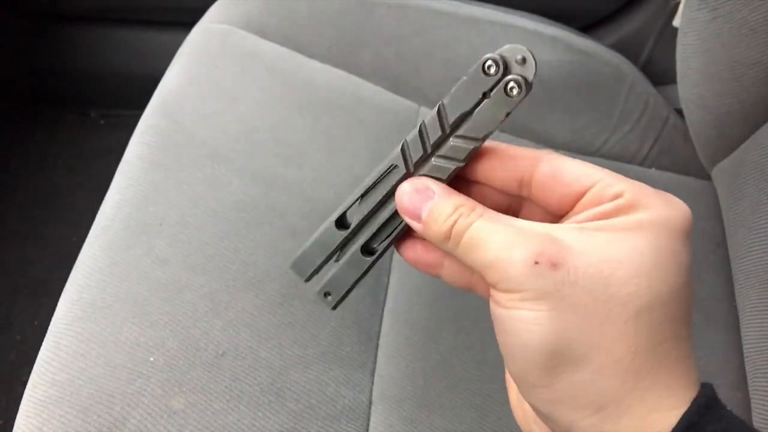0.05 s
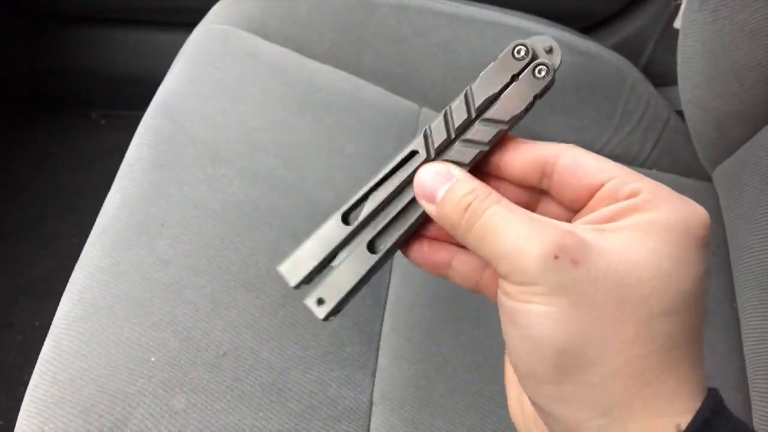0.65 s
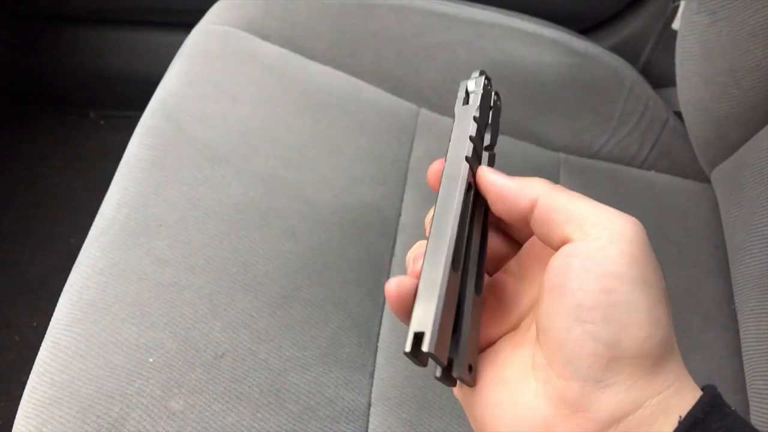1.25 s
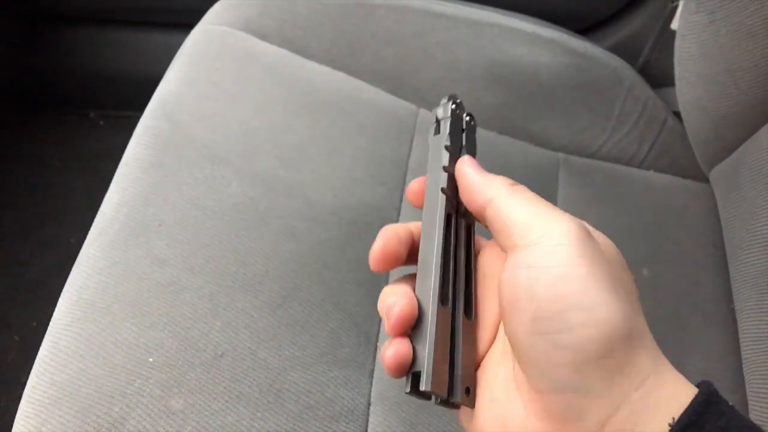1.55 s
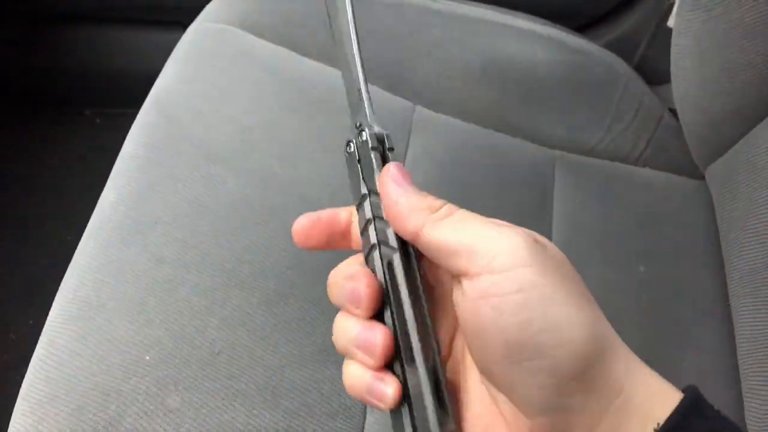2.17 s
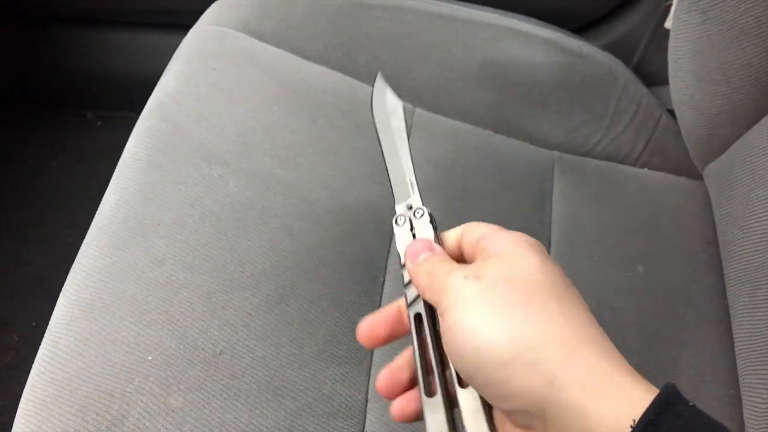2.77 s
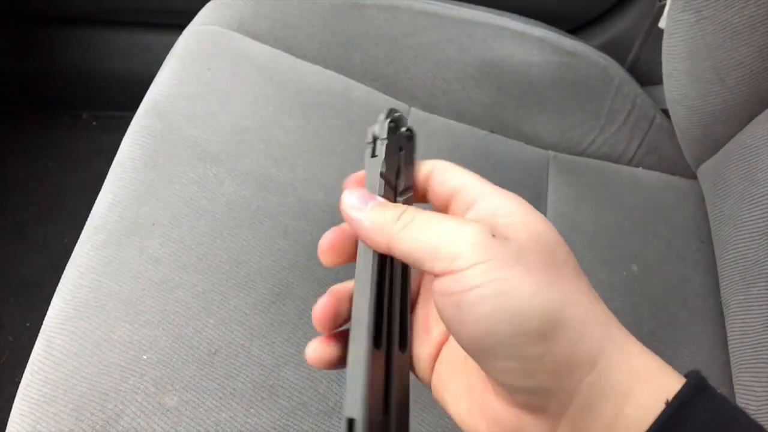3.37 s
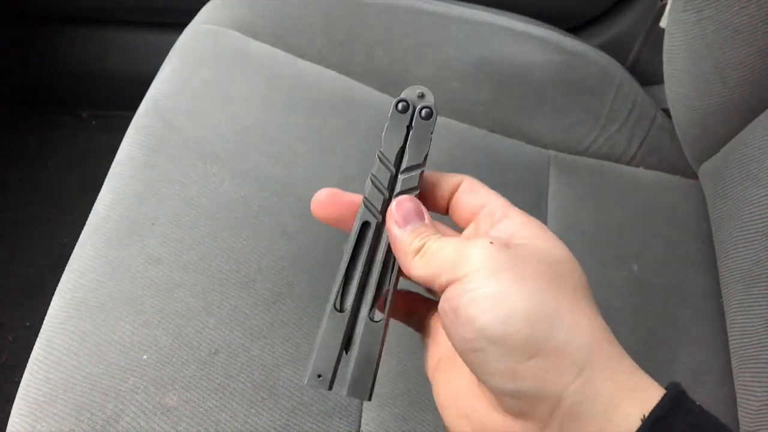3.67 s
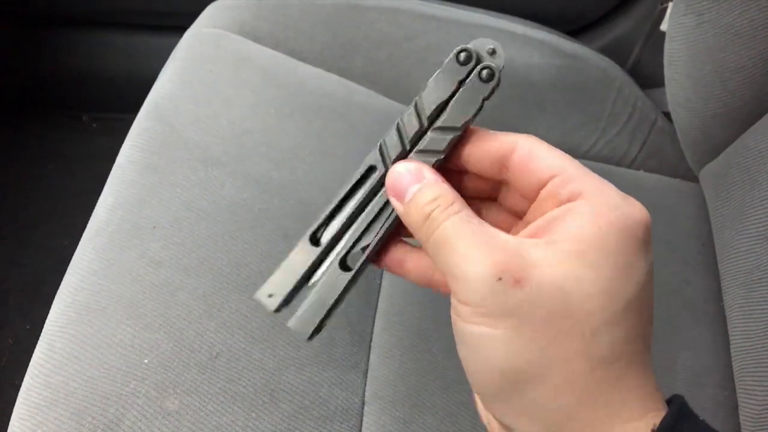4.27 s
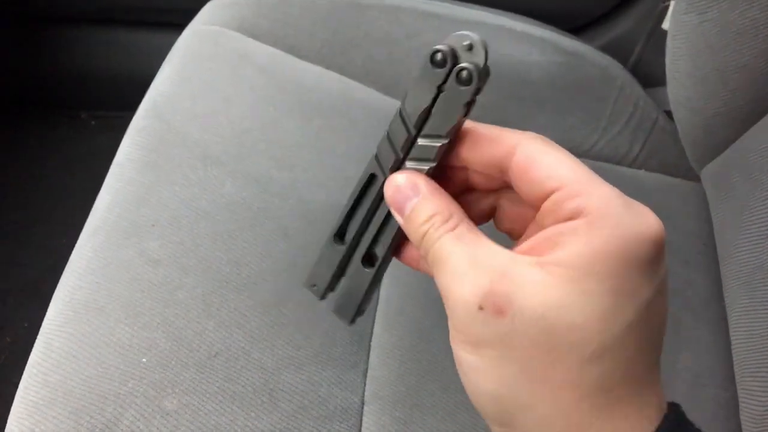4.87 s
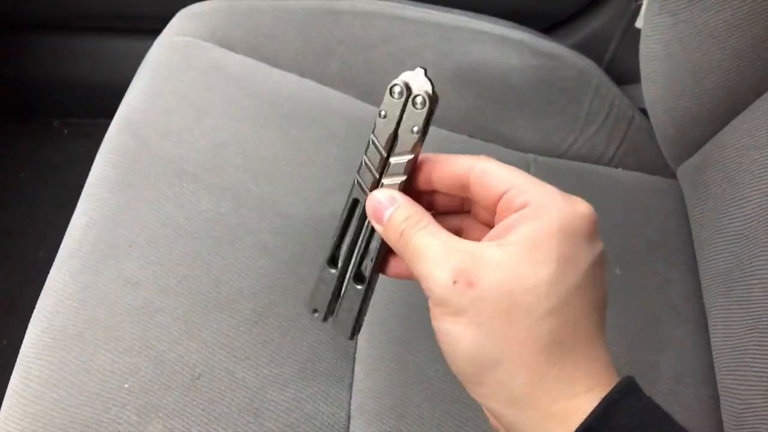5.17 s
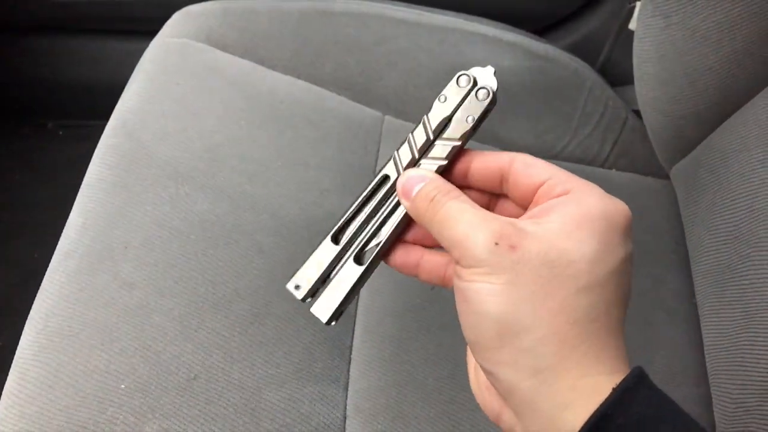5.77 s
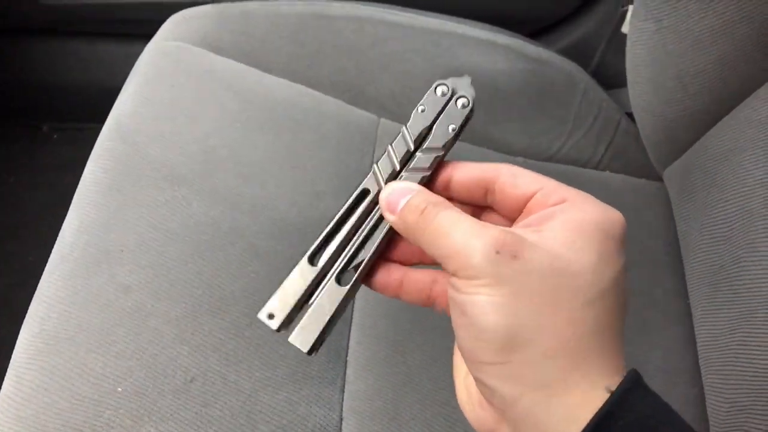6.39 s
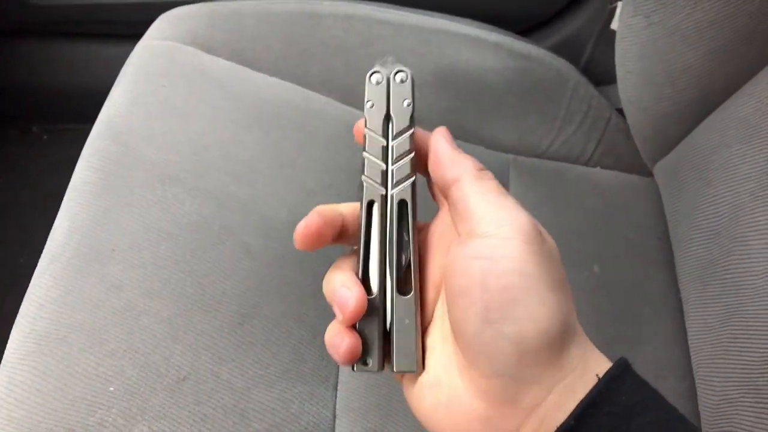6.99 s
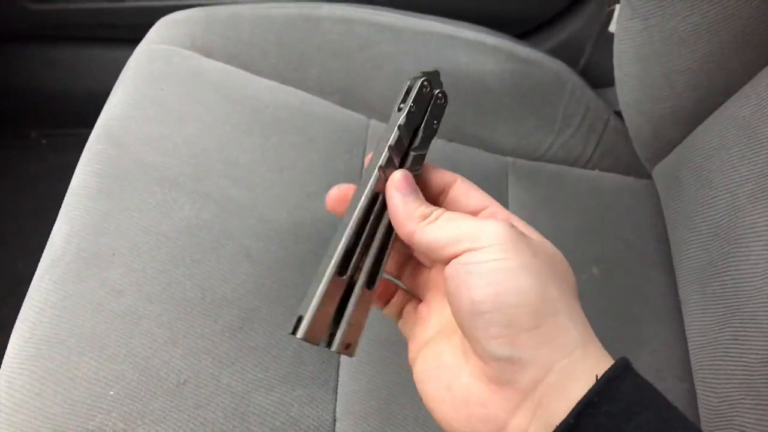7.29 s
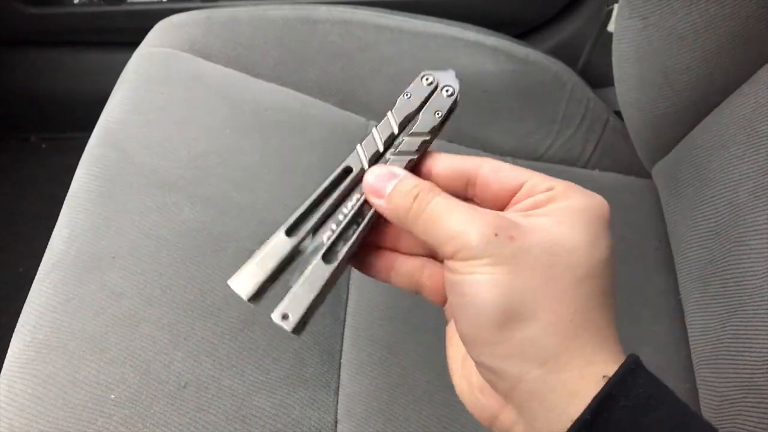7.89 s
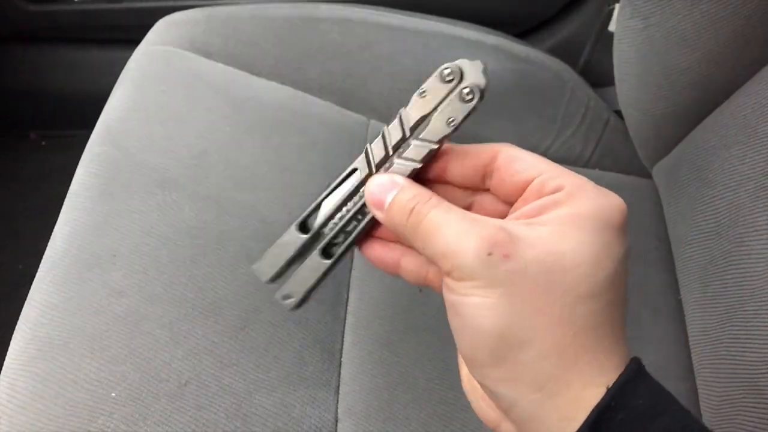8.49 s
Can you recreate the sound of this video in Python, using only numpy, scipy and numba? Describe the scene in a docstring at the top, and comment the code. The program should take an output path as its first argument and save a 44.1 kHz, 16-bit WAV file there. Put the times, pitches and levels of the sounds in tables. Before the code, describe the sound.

Inside a car with a low, steady rumble, a butterfly knife ticks faintly on its pivots. It is flipped open with sharp metal clacks and a brief high ring, then shut in a quick clatter. A second knife is shaken so its loose handles clack back and forth, taps as it turns in the fingers, and is shaken again. Faint skin rubbing and soft palm thuds come through on the close phone microphone.

```python
"""Over the low rumble of a car cabin, a butterfly knife is nudged on its pivots, then flipped open and
shut: its handles slam on the pins, and the free blade rings in its natural modes until the hand damps it.
A second knife is shaken so that its loose handles clack to and fro, is turned over in the fingers and is
shaken again. Throughout, skin rubs on metal, and the gain control of a phone close by ducks the cabin
after every loud click."""
import sys
import numpy as np
from scipy import signal
from scipy.fft import rfft, irfft, next_fast_len
from scipy.io import wavfile
from scipy.ndimage import uniform_filter1d
from numba import njit

SR = 44100
rng = np.random.default_rng(int(sys.argv[2]) if len(sys.argv) > 2 else 0)


def master_out(mix):
    """Clip the mix to full scale and print it as 16-bit PCM to the path in sys.argv[1]."""
    frames = np.transpose(np.atleast_2d(mix))
    ceiling = np.clip(frames, -1, 1)
    pcm = np.round(ceiling * 32767).astype(np.int16)
    wavfile.write(sys.argv[1], SR, pcm)


N = 381024
TIME = np.arange(N) / SR
HIT_SIZE = 8192  # samples in one impact
AGE = np.arange(HIT_SIZE) / SR
SWAP_S = 4.962  # the second knife takes over

# handle impacts of the first knife: start_s, level_db, body_db, treble_db
FLIPS = [(1.4639, -29, -1.5, -11), (2.074, -13.5, 1, 2), (2.1102, -13, 0, 1), (2.119, -4, 1, -3),
         (2.164, -30.5, 6, -2.5), (3.1342, -46, 6.5, 8.5), (3.1572, -14, 0.5, 6.5), (3.199, -11, 2.5, 11),
         (3.2064, -6.5, 3, -4.5), (3.2128, -17.5, -1.5, 8), (3.217, -9, 3.5, 4.5), (3.228, -14, 4, 7),
         (3.2475, -12, 1.5, -2.5), (3.273, -21.5, -1.5, -6), (3.2997, -14, 3.5, -7.5),
         (4.0908, -39, -4.5, -12), (4.7157, -45.5, 3.5, -13)]
# shakes of the second knife, where one handle touches just ahead of the return clack:
# out_s, out_db, back_s, back_db, touch_db (relative to the return), lead_s, body_db
SHAKES = [(5.273, -25.5, 5.33, -24, -7, 0.0057, 1), (5.3991, -21, 5.452, -16, -4, .0044, 3),
          (5.5174, -22, 5.5656, -15.5, -10, 0.0054, 1.5), (5.6331, -23, 5.6843, -16, -23, 0.0054, 4.5),
          (5.755, -25.5, 5.8039, -15.5, -9.5, .0057, 2), (5.8765, -22, 5.92, -15, -20, 0.0055, 3),
          (6.0006, -23, 6.0463, -15.5, -7, .0063, 2), (6.127, -21, 6.1848, -16.5, -13, 0.0099, 3.5),
          (6.2632, -18.5, 6.3096, -12.5, -7, 0.0041, 1), (6.377, -23, 6.4231, -9.5, -10, 0.0049, 2.5),
          (6.4909, -19, 6.5386, -13, -2.5, 0.0043, 1), (7.897, -24, 7.9574, -14.5, -4, .0057, -0.5),
          (8.042, -18.5, 8.0912, -11.5, -58, 0.0043, -1), (8.1664, -27.5, 8.2146, -13.5, -60, 0.0035, -1.5),
          (8.293, -17.5, 8.3366, -15.5, -60, 0.004, 0), (8.416, -15.5, 8.4696, -13, -60, .005, 1),
          (8.548, -13, 8.6005, -13.5, -60, 0.0053, 1)]
# natural frequencies of the blades, one row a knife: first_hz, second_hz, third_hz
BLADE_MODES = [(5008, 5797, 7682), (5211, 5688, 7590)]
# skin sliding along a handle: centre_s, half_duration_s, level_db
RUBS = [(0.932, 0.015, -70), (1.133, .036, -60), (1.286, .014, -62), (1.811, 0.037, -55),
        (1.957, .015, -57), (2.006, .18, -60), (2.268, .019, -55), (2.856, .072, -59), (3.11, 0.13, -60),
        (3.668, 0.016, -61), (3.786, 0.053, -63.5), (3.94, 0.019, -57.5), (5.203, 0.087, -67.5),
        (6.883, 0.017, -55.5), (7.814, 0.055, -66)]


def flips():
    """Impact excitation: the first knife's handles hit the pins and each other, crack and ring."""
    # spectrum of the contact: frequency_hz, gain_db
    colour = [(150, -32), (400, -27.5), (1000, -21), (1600, -21), (2400, -3.5), (3100, -4), (3900, -13),
              (4700, -2.5), (6500, -5), (9500, 1), (11500, -14.5), (14000, -8), (16500, -18)]
    # handle modes: pitch_hz, level_db, t60_s
    handle_modes = [(2405, -20, 0.064), (2660, -15.5, 0.057), (2984, -14.5, 0.011), (3103, -8.5, 0.026),
                    (3276, -12.5, 0.023), (6985, -28.5, 0.18), (8750, -22.5, 0.067), (9050, -21, 0.065),
                    (8950, -19, 0.042), (13430, -20, .09), (14100, -24, .07)]
    out = np.zeros(N)
    # metal on metal starts with one hard spike, whatever the angle of the blow
    spike = undb(21.5) * shape(signal.unit_impulse(HIT_SIZE, 2), colour)
    for s, db, body_db, treble_db in FLIPS:
        crack = undb(6.5) * shape(burst(crack_t60=.012, tail_db=-10, tail_t60=.076), colour)
        ring = undb(-1.5) * modes(handle_modes, scatter_db=-2, detune=.0032)
        add(out, s, undb(db) * (spike + shape(crack + ring, tilt(body_db, treble_db))))
    return out


def shakes():
    """Rattling through play: the second knife's loose handles strike at each end of their travel."""
    # taps as the knife turns in the fingers: start_s, level_db, body_db, treble_db, ring_db
    taps = [(6.7305, -14.5, 5, -11.5, -13.5), (6.773, -21.5, 2.5, -16, -6), (6.7876, -30.5, 3.5, -20, -4),
            (6.8307, -35, 7, -6, 4.5), (7.069, -33.5, -4, -0.5, 8), (7.0724, -27.5, 5, -10.5, -22),
            (7.337, -33.5, -9, -25, 3), (7.8154, -46.5, 6, 8, 2.5)]
    firm_db = -13.5
    out = np.zeros(N)
    for out_s, out_db, back_s, back_db, touch_db, lead_s, body_db in SHAKES:
        # outward clack, early touch, return clack: start_s, level_db, treble_db, ring_db
        strokes = [(out_s, out_db, 3.5, -1),
                   (back_s - lead_s, back_db + touch_db, 2, -1),
                   (back_s, back_db, 2, .5)]
        for s, db, treble_db, ring_db in strokes:
            extra_body_db = min(.58 * (firm_db - db), 8)  # softer blows are duller
            add(out, s, clack(db, body_db + extra_body_db, treble_db, ring_db))
        knock_s = out_s + (back_s - out_s) * rng.uniform(.1, .5)
        add(out, knock_s, pivot_knock(db=-38.5, grip_db=-7.5))
    for s, *blow in taps:
        add(out, s, clack(*blow))
    return out


def clack(db, body_db, treble_db, ring_db):
    """Impulse response: a loose handle hits the blade with a spike and a crack, and its modes decay."""
    # spectrum of the contact: frequency_hz, gain_db
    colour = [(200, -20.5), (500, -35), (1100, -13), (1600, -18), (3200, -13), (4050, -19), (5600, 2),
              (6600, -10.5), (7600, -0.5), (10400, -8), (11200, -1), (11800, -9.5), (14500, -2.5),
              (16500, -21.5)]
    # handle modes: pitch_hz, level_db, t60_s
    handle_modes = [(1080, -17.5, 0.0047), (1995, -21.5, 0.039), (2170, -32, 0.088), (3106, -18, 0.023),
                    (5260, -13, 0.063), (5720, -6.5, 0.021), (5722, -8, 0.042), (6380, -12.5, 0.019),
                    (6710, -12, 0.035), (6970, -23, 0.09), (7554, -6, 0.04), (11480, -10, 0.014),
                    (12100, -9, 0.027), (15500, -45, 0.027), (15800, -6, 0.019)]
    spike = undb(4.5) * signal.unit_impulse(HIT_SIZE, 2)
    crack = undb(10) * shape(spike + burst(crack_t60=.004, tail_db=-11, tail_t60=.045), colour)
    ring = undb(ring_db) * modes(handle_modes, scatter_db=2, detune=.0042)
    return undb(db) * shape(crack + ring, tilt(body_db, treble_db))


def blade(rise_s=.0072, waver_db=3, waver_hz=80, pitch_spread=.0011):
    """Free vibration: the blade's ring swells, wavers as it swings and is damped by the closing hand."""
    # excitations of the blade: start_s, first_mode_db, second_mode_db, third_mode_db, free_s
    rings = [(.001, -64, -87, -87, .25), (1.13, -66, -77, -84, .1), (1.29, -54, -63, -61, 0.012),
             (1.465, -41.5, -53, -64, 0.074), (2.078, -27, -48.5, -42.5, 0.027),
             (2.124, -18.5, -23.5, -8, 0.03), (3.163, -34, -42, -20, 0.034), (3.199, -22, -21, -16, 0.018),
             (3.221, -13.5, -6, -16, 0.043), (3.288, -44, -37, -16.5, 0.02), (3.304, -27.5, -48, -64, 0.17),
             (4.09, -64, -66, -77, .08), (4.16, -57, -80, -86, .05), (4.716, -56, -69.5, -78, 0.22),
             (6.541, -41, -66, -62, 0.39), (6.732, -50, -42, -49, 0.072), (6.831, -52, -49, -66, 0.18),
             (7.336, -49.5, -70, -67.5, 0.1)]
    # damping of the three modes: free_t60_s, grip_t60_s
    decays = [(.42, .13), (0.56, 0.17), (0.84, 0.078)]
    power = np.zeros((2, 3, N))  # knife, mode, sample
    age = TIME[:SR // 2]
    rise = np.minimum(age / rise_s, 1)
    for s, *levels, free_s in rings:
        # each blow adds energy to the modes of the knife in hand
        for mode_power, db, (free_t60, grip_t60) in zip(power[int(s > SWAP_S)], levels, decays):
            free = rise * fade(np.maximum(age - rise_s, 0), free_t60)
            grip = fade(np.maximum(age - free_s, 0), grip_t60)
            add(mode_power, s, (undb(db) * free * grip) ** 2)
    for s, _, db in RUBS:  # friction excites the lowest mode
        singing = undb(db - 7) * rise * fade(age, t60=.58)
        add(power[int(s > SWAP_S), 0], s, singing ** 2)
    out = 0
    for hz, mode_power in zip(np.ravel(BLADE_MODES), power.reshape(-1, N)):
        phase = 2 * np.pi * np.cumsum(hz * (1 + pitch_spread * drift(waver_hz))) / SR
        out += np.sqrt(mode_power) * undb(waver_db * drift(waver_hz)) * np.sin(phase)
    return out


def nudges(rebound_db=-6, mean_rebound_s=.0076, sing_db=-21, sing_t60=.26):
    """Mechanical coupling: a handle knocks in its play, rebounds once and sets the blade ringing."""
    # soft shifts of a handle: start_s, level_db, grip_db
    shifts = [(.1381, -44.5, 4), (.2708, -48.5, 8), (.5247, -47.5, 9), (.6544, -46, 2), (.6978, -51, 11),
              (.8224, -51.5, 7), (1.4774, -43.5, 12), (2.9352, -52, -3), (3.6097, -42.5, -5),
              (3.9304, -47.5, 2.5), (3.9409, -45, 0), (4.0562, -46.5, 8), (4.0891, -39.5, 3),
              (4.1794, -54.5, 21), (4.3006, -47, 16), (4.3331, -51.5, 0.5), (4.716, -43, 10),
              (4.8439, -52.5, 4), (4.9402, -52, 6.5), (6.7315, -34.5, -9.5), (6.776, -47, -6),
              (6.8443, -41.5, -5), (6.8813, -46, 0), (7.3367, -41.5, -12), (7.8271, -43.5, 4),
              (8.5884, -46, 3)]
    out = np.zeros(N)
    for s, db, grip_db in shifts:
        add(out, s, pivot_knock(db, grip_db))
        add(out, s + mean_rebound_s * (.5 + rng.random()), pivot_knock(db + rebound_db, grip_db))
        # a soft push favours the lowest blade mode
        singing = [(hz, sing_db - 7 * k, sing_t60) for k, hz in enumerate(BLADE_MODES[int(s > SWAP_S)])]
        add(out, s, undb(db) * modes(singing, scatter_db=1.5, detune=.0018))
    return out


def pivot_knock(db, grip_db):
    """Damped resonance: a knock in a loose pivot excites two brief modes; the grip colours its crack."""
    # spectrum of the knock: frequency_hz, gain_db
    colour = [(500, -34), (1200, -8.5), (1750, -5), (2130, 6.5), (2550, -25.5), (3300, -5), (4000, -14),
              (5500, -18), (8000, -13.5), (15000, -37)]
    # modes of the pivot: pitch_hz, level_db, t60_s
    pivot_modes = [(1983, -11, 0.031), (2186, 0, 0.039)]
    grip = [(700, 0), (1300, grip_db), (2000, 0)]
    crack = undb(9.5) * shape(burst(crack_t60=.017, tail_db=-9.5, tail_t60=.03), colour, grip)
    ring = undb(-1.5) * modes(pivot_modes, scatter_db=1.5, detune=.021)
    return undb(db) * (crack + ring)


def thuds(palm_db=-14, palm_slap_db=-7.5):
    """Compliant impact: the palm yields to the grip, so the blow holds mostly low frequencies."""
    # the grip landing in the palm: start_s, level_db, slap_db
    landings = [(1.745, -38, 6), (1.756, -23, 4.5), (1.762, -26, 6), (2.829, -47, 15), (6.338, -35.5, -5),
                (6.436, -26.5, 2.5), (7.313, -37, -14.5), (8.316, -29, -5)]
    # spectrum of the blow: frequency_hz, gain_db
    colour = [(90, -18.5), (200, 0.5), (360, 6.5), (700, -2), (1000, -8.5), (1600, -12.5), (3000, -24),
              (7000, -39), (15000, -42.5)]
    # the first knife shuts into the hand, so those strikes also reach the palm
    closing = [(s, db + palm_db, palm_slap_db) for s, db, *_ in FLIPS if 3.15 < s < 3.31]
    out = np.zeros(N)
    for s, db, slap_db in landings + closing:
        slap = [(500, .0056), (1400, slap_db)]
        contact = burst(crack_t60=.026, tail_db=-13.5, tail_t60=.15)
        add(out, s, undb(db + 9.5) * shape(contact, colour, slap))
    return out


def rubs(slip_half_s=.044, slip_db=-57.5):
    """Friction noise: skin swishes unevenly on metal in handling and at the return of every shake."""
    # spectrum of the friction: frequency_hz, gain_db
    colour = [(600, -5), (2000, 4.5), (4000, 1.5), (8000, 2), (12000, 0.5), (16000, -9)]
    slips = [(back_s, slip_half_s, slip_db) for _, _, back_s, *_ in SHAKES]
    swell = sum(undb(db) * np.exp(-((TIME - s) / half_s) ** 2) for s, half_s, db in RUBS + slips)
    return swell * undb(1.6 * drift(rate_hz=170)) * coloured_noise(colour)


def cabin():
    """Superposed noise bands: a low rumble, a soft hush and a faint whine fill the car."""
    # spectra of the three bands: frequency_hz, gain_db
    rumble_colour = [(12, -43.5), (20, -9), (43, 1.5), (124, 0), (142, 1), (172, -10), (268, -13.5),
                     (300, -19.5), (390, -43), (660, -120)]
    hush_colour = [(120, -14.5), (200, 1.5), (280, 1), (450, -6), (700, -12.5), (1000, -14.5), (1500, -20),
                   (3000, -26.5), (8000, -31.5), (16000, -35)]
    whine_colour = [(800, -37), (940, -4.5), (985, -0.5), (1030, -8), (1200, -38.5)]
    # level curves of the rumble and the whine: time_s, level_db
    rumble_levels = [(0, -38.5), (.4, -45.5), (1.05, -42), (1.6, -43.5), (2, -40.5), (2.4, -46), (3, -44),
                     (3.7, -43.5), (4.6, -46.5), (5.1, -45.5), (5.4, -49), (6.101, -44.5), (6.7, -46),
                     (7.8, -44), (8.64, -45)]
    whine_levels = [(0, -71), (1.9, -72.5), (2.3, -79)]
    rumble = noise_bed(rumble_colour, rumble_levels, flicker_db=2.04, flicker_hz=12)
    hush = noise_bed(hush_colour, [(0, -54)], flicker_db=.57, flicker_hz=20)
    whine = noise_bed(whine_colour, whine_levels, flicker_db=3.3, flicker_hz=3.5)
    # the level dips for an instant
    dip = 1 - .85 * np.exp(-((TIME - SWAP_S) / .011) ** 4)
    return (rumble + hush + whine) * dip


def noise_bed(colour, levels, flicker_db, flicker_hz):
    """Amplitude modulation: coloured noise follows a level curve and flickers about it."""
    level_db = np.interp(TIME, *np.transpose(levels))
    return coloured_noise(colour) * undb(level_db + flicker_db * drift(flicker_hz))


def burst(crack_t60, tail_db, tail_t60):
    """Scattering and absorption: a dense crack trails reflections that the upholstery has dulled."""
    noise = rng.standard_normal(HIT_SIZE)
    noise /= np.sqrt(uniform_filter1d(noise ** 2, size=32))  # even out the envelope
    tail = shape(noise * fade(AGE, tail_t60), [(7500, .0044), (12000, -3)])
    return noise * fade(AGE, crack_t60) + undb(tail_db) * tail


def modes(table, scatter_db, detune):
    """Modal superposition: damped sines, which every blow meets at a different point and grip."""
    out = 0
    for hz, db, t60 in table:
        strength, shift, phase = rng.standard_normal(3)
        cycles = hz * (1 + detune * shift) * AGE + phase
        out += undb(db + scatter_db * strength) * fade(AGE, t60) * np.sin(2 * np.pi * cycles)
    return out


def tilt(body_db, treble_db):
    """Spectral balance: flat blows carry more body, edge-on blows more treble."""
    return [(3500, body_db), (4800, 0), (8500, 0), (11000, treble_db)]


def shape(x, *colours):
    """Minimum-phase filtering by the product of (frequency_hz, gain_db) curves."""
    size = next_fast_len(len(x))
    log_f = np.log(np.arange(size // 2 + 1) * SR / size + 1)
    db = sum(np.interp(log_f, np.log(c[:, 0]), c[:, 1]) for c in map(np.array, colours))
    cepstrum = irfft(np.log(undb(db)), size)
    # folding the cepstrum onto positive time makes the filter causal
    cepstrum[1:size // 2] *= 2
    cepstrum[size // 2 + 1:] = 0
    return irfft(rfft(x, size) * np.exp(rfft(cepstrum)), size)[:len(x)]


def coloured_noise(colour):
    """Spectral shaping of white noise, scaled to rms 1."""
    noise = shape(rng.standard_normal(N), colour)
    return noise / np.sqrt(np.mean(noise ** 2))


def drift(rate_hz):
    """Linear interpolation between random values, with a spread near 1."""
    step = int(SR / rate_hz)
    held = np.repeat(rng.standard_normal(N // step + 2), step)
    return uniform_filter1d(held, step)[:N]


def undb(db):
    """Decibels to amplitude ratio."""
    return 10 ** (np.asarray(db) / 20)


def fade(age, t60):
    """Exponential decay that loses 60 dB in t60 seconds."""
    return np.exp(-np.log(1000) * age / t60)


def add(out, s, x):
    """Superpose x on out from time s."""
    i = int(s * SR)
    out[i:i + len(x)] += x[:len(out) - i]


@njit
def follow(wanted, attack, release):
    """Envelope following: hold each peak, let it sink and glide after it; rates are per sample."""
    out, held, now = np.empty(len(wanted)), 0., 0.
    for i in range(len(wanted)):
        held = max(wanted[i], held * (1 - release))
        now += (held - now) * attack
        out[i] = now
    return out


def gain_control(x, threshold_db=-36.5, slope=.4, max_cut_db=10.5, attack_s=.025, release_s=.55):
    """Compression: loud clicks turn the gain down, so the cabin ducks behind them and creeps back."""
    level_db = 10 * np.log10(np.abs(uniform_filter1d(x ** 2, size=132)) + 1e-12)
    cut_db = np.clip(slope * (level_db - threshold_db), 0, max_cut_db)
    return x * undb(-follow(cut_db, 1 / (attack_s * SR), 1 / (release_s * SR)))


def scene():
    """Linear superposition of both knives, the hand and the cabin, in mono."""
    return (flips() + shakes() + blade() + nudges() + thuds() + rubs() + cabin())[None]


def record(dry):
    """Band limiting and compression: the phone cuts the deep bass, rides the gain and cuts the top."""
    bass_cut = signal.butter(6, 41, "high", fs=SR, output="sos")
    top_cut = signal.ellip(8, .2, 70, 16300, fs=SR, output="sos")
    ducked = gain_control(signal.sosfilt(bass_cut, dry[0]))
    return signal.sosfilt(top_cut, ducked)[None]


dry = scene()
out = record(dry)
master_out(out)
```